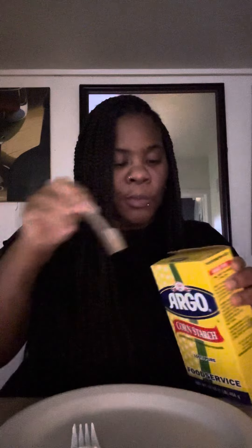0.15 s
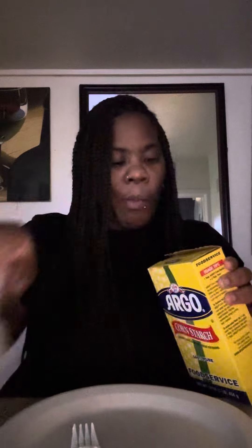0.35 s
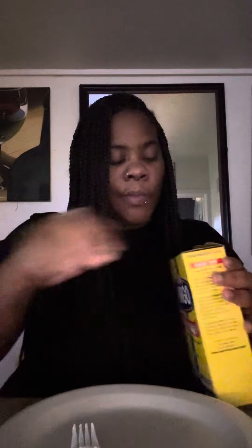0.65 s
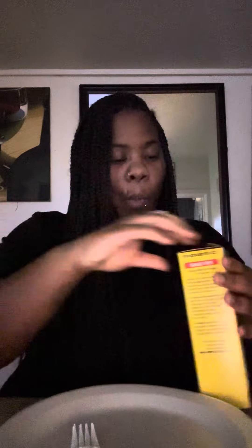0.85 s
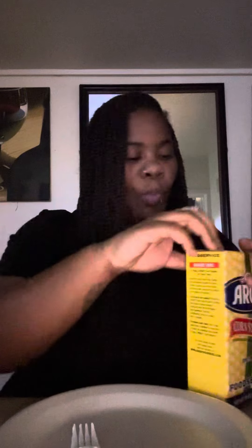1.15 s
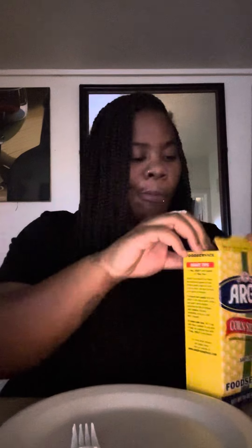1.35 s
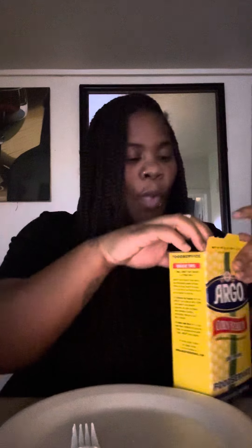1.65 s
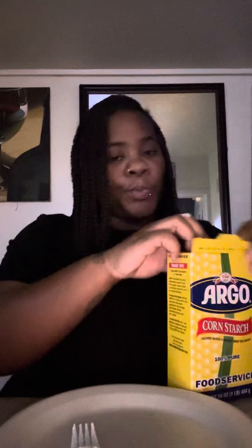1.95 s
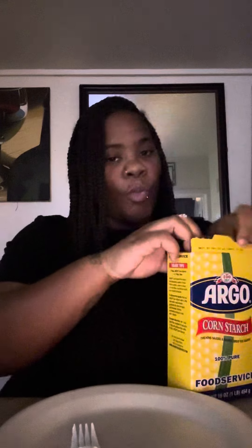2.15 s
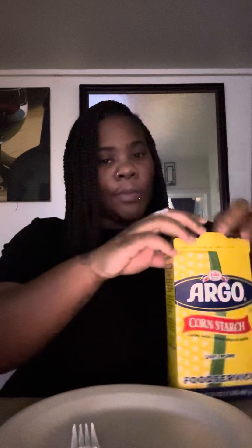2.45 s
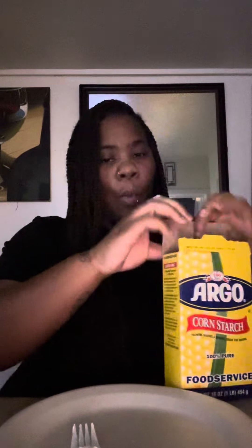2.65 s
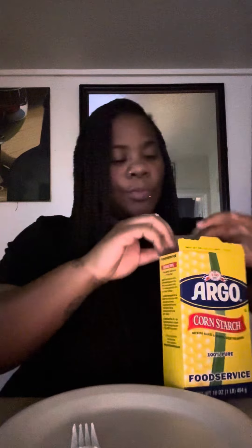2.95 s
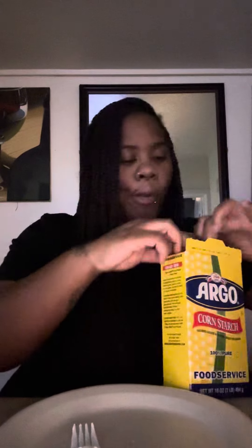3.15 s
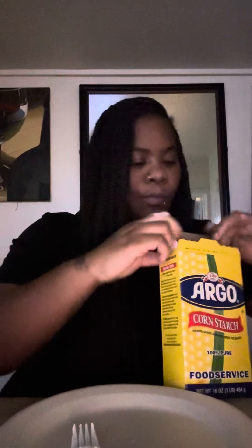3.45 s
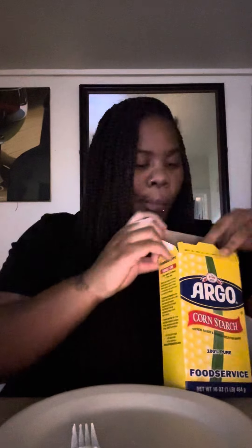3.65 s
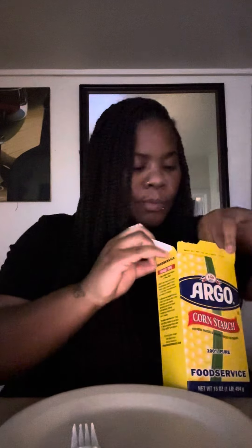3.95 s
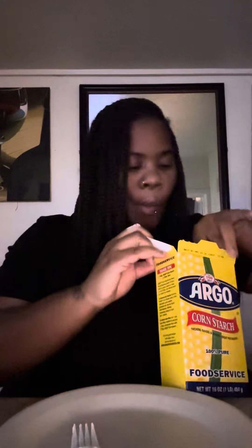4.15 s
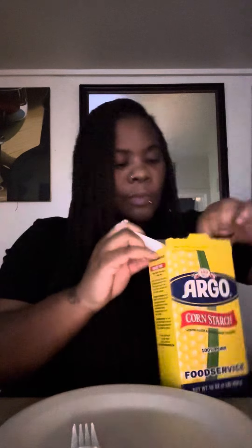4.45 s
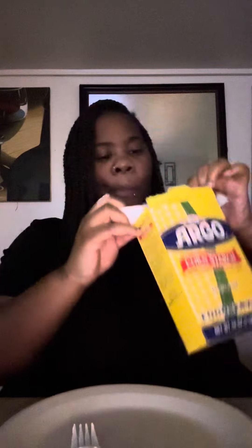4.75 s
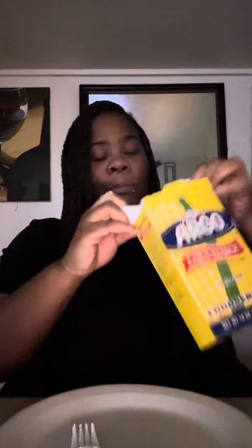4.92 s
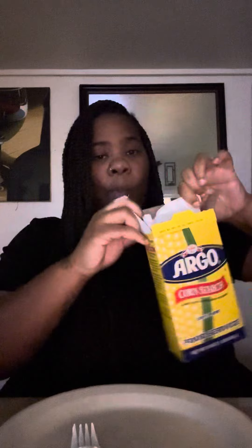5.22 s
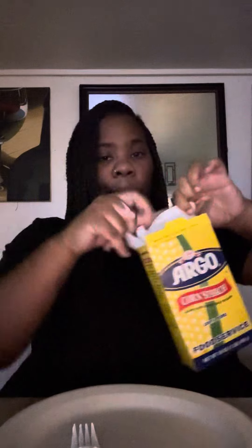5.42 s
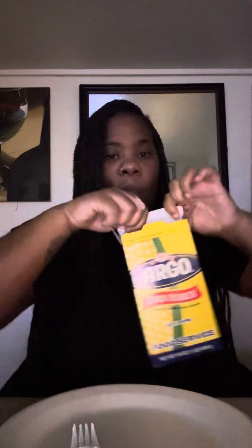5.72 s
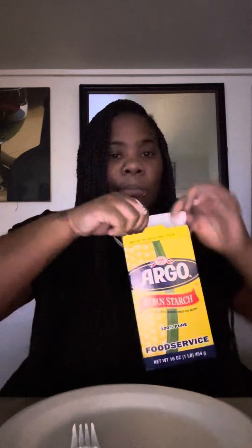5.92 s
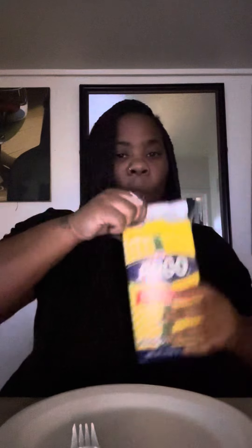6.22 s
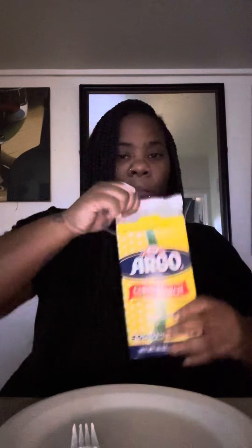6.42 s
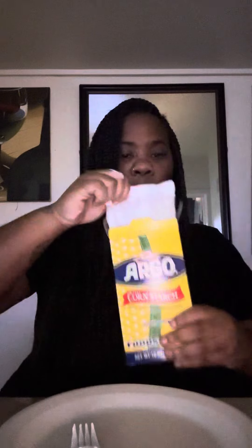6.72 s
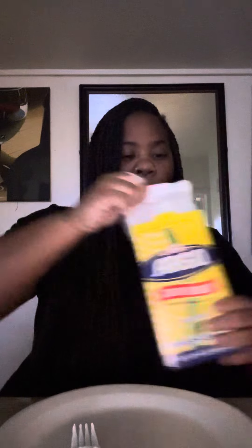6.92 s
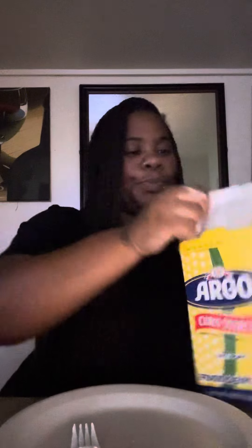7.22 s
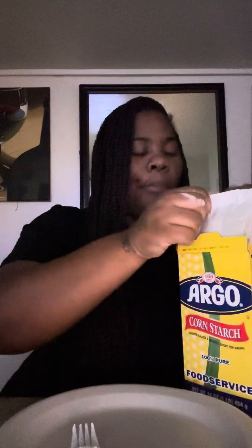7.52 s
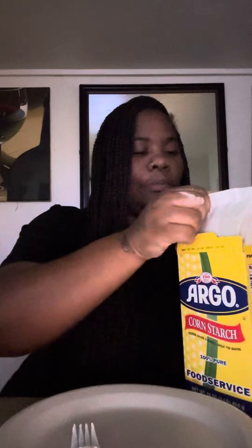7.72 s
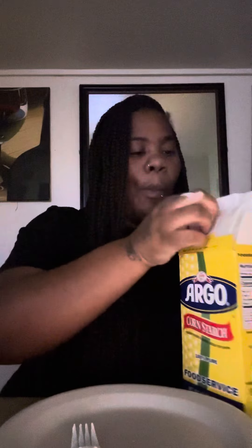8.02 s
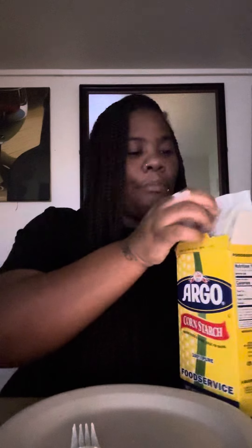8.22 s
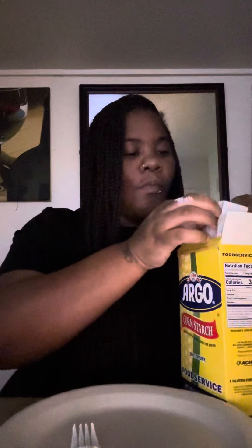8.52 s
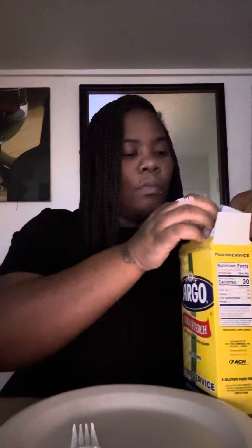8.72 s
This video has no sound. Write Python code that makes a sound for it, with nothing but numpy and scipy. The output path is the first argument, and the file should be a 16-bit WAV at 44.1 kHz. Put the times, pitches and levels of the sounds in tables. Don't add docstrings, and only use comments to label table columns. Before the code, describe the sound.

A quiet indoor room with a very faint low appliance drone; a phone microphone sits close to the hands. From 0 to 1.5 s there is a soft thud, then barely audible rubbing and light cardboard dents. A crisp tick comes at 1.6 s, then a firm rip and table push around 2.3 s and a hollow pop at 2.5 s. Light rustling and small pops continue to 3.7 s, followed by a brief lull. At 4.0-4.5 s the box tears in strong crackling bursts, loudest near 4.4 s. From 4.6 to 6.4 s come uneven tugs, folds and papery ticks, with a sharp burst at 6.5 s. Bright liner snaps cluster at 6.8-7.1 s, with a soft nudge at 7.2 s. Dense, loud crinkling runs 7.6-8.4 s, peaking in a dull snap near 8.35 s, then thins to scattered crackles until about 8.9 s.

```python
import sys
import numpy as np
from scipy import signal
from scipy.fft import rfft, irfft, next_fast_len
from scipy.io import wavfile
from scipy.ndimage import uniform_filter1d, map_coordinates

SR = 44100
rng = np.random.default_rng(int(sys.argv[2]) if len(sys.argv) > 2 else 0)


def ratio_of_db(decibels):
    return 10 ** (np.asarray(decibels, float) / 20)


def to_wav(sig):
    pcm = np.clip(np.atleast_2d(sig), -1, 1) * 32767
    pcm = np.round(pcm).astype(np.int16)
    wavfile.write(sys.argv[1], SR, pcm.T)


N = 391166


def unit(x):
    return x / np.sqrt(np.mean(x ** 2) + 1e-20)


def along(points, hz):
    f, v = np.transpose(points)
    return np.interp(np.log(hz + 1), np.log(f + 1), v)


def filtered(x, response):
    m = next_fast_len(N + SR // 2)
    return irfft(rfft(x, m) * response(np.fft.rfftfreq(m, 1 / SR)), m)[..., :N]


def coloured(x, spectrum):
    size = 4096
    cepstrum = irfft(np.log(ratio_of_db(along(spectrum, np.fft.rfftfreq(size, 1 / SR)))), size)
    cepstrum[1:size // 2] *= 2
    cepstrum[size // 2 + 1:] = 0
    h = irfft(np.exp(rfft(cepstrum)), size)[:size // 2]
    return signal.fftconvolve(x, h[None] / np.linalg.norm(h), axes=1)[:, :N]


def bursts(times, gains, t60, rise, ring_hz, ring, spectrum, size=900, uneven_db=0, focus_db=0):
    def column(v):
        return np.reshape(v, (-1, 1, 1))

    lead = 100
    t = (np.arange(size) - lead) / SR
    hz = np.fft.rfftfreq(size, 1 / SR) + 1

    ripples = np.arange(3, 21)[:, None]
    ripple_gains = uneven_db / 3 * rng.standard_normal((len(times), 1, len(ripples)))
    colour_db = ripple_gains @ np.cos(2 * np.pi * ripples * hz / SR)
    colour_db = colour_db - column(focus_db) * abs(np.log2(hz / column(ring_hz)))
    noise = irfft(rfft(rng.standard_normal((len(times), 2, size))) * ratio_of_db(colour_db), size)
    noise /= noise.std(axis=2, keepdims=True)

    phase = rng.random((len(times), 2, 1))
    tone = column(ring) * np.cos(2 * np.pi * (column(ring_hz) * t + phase))
    burst = (noise + tone) * np.where(t < 0, np.exp(t / rise), ratio_of_db(-60 * t / t60))
    burst += noise * (t > 0) * 0.22 * ratio_of_db(-60 * t / (9 * t60))

    body = unit(ratio_of_db(along(spectrum, hz)))
    heard = np.linalg.norm(rfft(burst) * body, axis=2, keepdims=True)
    burst *= column(gains) * np.sqrt(size / 2) / heard
    at = (np.round(np.asarray(times) * SR).astype(int)[:, None] + np.arange(size)).ravel()
    placed = [np.bincount(at, burst[:, k].ravel(), N + SR)[lead:N + lead] for k in (0, 1)]
    return coloured(np.array(placed), spectrum)


# frequency in Hz, density in dB per Hz.
AIR_SPECTRUM = [(22, -22), (109, -12), (143, -1.5), (169, -11.5), (278, -16.5), (398, -19), (569, -19.5),
                (2400, -50.5), (6500, -85)]
# line frequency in Hz, width in Hz, level in dB.
DRONE_LINES = [
    (61.3, 7.6, -58),
    (134.4, 3.1, -65),
    (262, 75, -51),
]


def still_room():
    air = unit(filtered(rng.standard_normal((2, N)), lambda hz: ratio_of_db(along(AIR_SPECTRUM, hz))))

    def line(centre, width):
        noise = rng.standard_normal((2, N))
        return unit(filtered(noise, lambda hz: 1 / (1 + ((hz - centre) / width * 2) ** 2)))

    drone = sum(ratio_of_db(db) * line(hz, width) for hz, width, db in DRONE_LINES)
    return ratio_of_db(-47.5) * air + drone


# time in seconds, peak in dB, ringing frequency in Hz.
TABLE_BUMPS = [
    (.016, -31.5, 104),
    (2.331, -29, 150),
    (2.524, -35, 134),
    (3.601, -35.5, 198),
    (4.011, -34.5, 223),
    (6.129, -35.5, 165),
    (7.218, -35.5, 199),
]
# frequency in Hz, level in dB.
TABLE_BODY = [(40, -10), (90, 9), (140, -6.5), (220, 4.5), (350, 3.5), (700, -37.5)]


def bumps():
    s, peak_db, hz = np.transpose(TABLE_BUMPS)
    return bursts(s, ratio_of_db(peak_db + 30.5), 0.074, 0.00037, hz, 0.56, TABLE_BODY, size=3000, focus_db=6.5)


# peak time in
# seconds, strength in dB, seconds to rise 20 dB, seconds to fall 20 dB, brightness in dB.
FLAP_MOVES = [(0, -53, .1, 0.5, -2), (.58, -49.5, 0.34, 0.24, 0), (.9, -52.5, 0.44, 1.8, 1.5),
              (1.2, -50, .5, 0.2, 4), (1.43, -48, .3, 0.26, 4), (1.627, -43, 0.08, 0.2, 5),
              (1.902, -40, 0.21, 0.1, 5), (2.17, -46.5, 0.3, 0, -0.5), (2.34, -39.5, 0.23, 0.3, .5),
              (2.54, -47.5, .1, 0.7, 2.5), (2.72, -45.5, .3, 0.33, 5), (2.9, -44, 0.03, 0.6, 3.5),
              (3.11, -39.5, 0.18, 0.16, 1.5), (3.3, -38.5, 0.17, .3, 2.5), (3.41, -38, 0.15, .5, 1),
              (3.6, -40, 0, .5, .5), (3.78, -56, .3, 3, 1)]
TUG_MOVES = [(4.016, -26.5, 0.056, 0.051, 0.5), (4.11, -39, 0.48, 0.62, 1.5), (4.183, -26, 0.039, 0.033, 1),
             (4.394, -22, 0.081, 0.19, -1.5), (4.601, -34.5, 0.47, 0.082, -0.5),
             (4.767, -32.5, 0.034, 0.88, 0.5), (5.173, -33, 0.2, 0.091, 0), (5.486, -30.5, 0.064, 0.29, 2),
             (5.675, -33, 0.015, 0.32, -5.5), (5.948, -33.5, 0.24, 0.071, 2), (6.124, -33, 0.099, 0.36, -2),
             (6.335, -37, 0.41, 0.019, 3), (6.449, -30.5, 0.027, 0.14, -7.5),
             (6.497, -25, 0.052, 0.062, 5.5), (6.89, -42, 0.14, 0.24, 0.5), (7.11, -31.5, 0.12, 0.23, 2)]
PICK_MOVES = [(7.413, -32.5, 0.028, 0.16, 1), (7.496, -38, 0.12, 0.017, -4),
              (7.706, -24, 0.045, 0.092, -2.5), (7.743, -24.5, 0.069, 0.054, 0.5),
              (7.884, -27, 0.069, 0.21, 0.5), (7.985, -23, 0.0825, 0.065, 1),
              (8.15, -22.5, 0.22, 0.078, -1), (8.256, -25.5, 0.089, 0.23, 1.5),
              (8.486, -34, 0.016, 0.082, -36), (8.555, -42.5, 0.37, 0.46, 16),
              (8.714, -29.5, 0.26, 0.12, 0), (8.87, -33.5, 0.12, .1, 4.5)]


def handling():
    rest_power, rest_bright_db = ratio_of_db(2 * -65), -7
    rounded = 1.062
    s = np.arange(0, N, 64) / SR
    moves = np.transpose(FLAP_MOVES + TUG_MOVES + PICK_MOVES)[..., None]
    at, peak_db, rise, fall, bright_db = moves
    distance = np.where(s < at, (at - s) / abs(rise), (s - at) / abs(fall))
    power = ratio_of_db(2 * (peak_db - 20 * distance ** rounded))
    total = power.sum(0) + rest_power
    sheet_db = 10 * np.log10(total)
    bright_db = ((power * bright_db).sum(0) + rest_power * rest_bright_db) / total
    box_db = sheet_db - 1 - np.maximum(bright_db, -4)
    middle_db = -40
    edge_db = middle_db + 1.253 * (sheet_db - middle_db) - 10 + bright_db
    return s, sheet_db, box_db, edge_db


def patchy(depth_db):
    z = signal.stft(rng.standard_normal((2, N)), nperseg=512)[2]
    field = uniform_filter1d(rng.standard_normal(z.shape[1:]), size=7, axis=0)
    field = uniform_filter1d(field, size=9, axis=1)
    return signal.istft(z * ratio_of_db(depth_db * unit(field)), nperseg=512)[1][:, :N]


# frequency in Hz, level in dB.
SHEET_BODY = [(900, -20), (1500, -20), (1800, -11), (2200, -2), (2500, -12), (3000, -9), (3500, -25.5),
              (6000, -41)]
BOX_BODY = [(200, -13.5), (400, -3), (1200, -4), (1500, -1), (2400, -40.5)]
EDGE_BODY = [(2000, -43), (3500, 0), (5500, -3.5), (6800, -1), (9000, -9), (11000, -12), (15000, -18),
             (16200, -103)]
RUB_BODY = [(900, -13.5), (1500, -20.5), (1800, -7), (2200, -2.5), (2500, -10.5), (3000, -10.5),
            (3800, -25.5), (6000, -38)]


def crinkle():
    s, sheet_db, box_db, edge_db = handling()
    count = 4200
    times = rng.random(count) * N / SR
    draw = rng.standard_normal((count, 7))
    size_db = 1.7 * map_coordinates(rng.standard_normal(600), [times * 60]) + 3.54 * draw[:, 0]
    clock = np.arange(N) / SR
    creased = np.clip((np.interp(clock, s, box_db) + 57.5) / 20, .1, .92)
    layers = [(sheet_db - 2.5, SHEET_BODY, RUB_BODY, .007, 2300, .22),
              (box_db - 4.5, BOX_BODY, BOX_BODY, .014, 850, .35),
              (edge_db - 3.5, EDGE_BODY, EDGE_BODY, .005, 6500, .4)]
    out = 0
    for k, (level_db, body, rub_body, t60, hz, spread) in enumerate(layers):
        pitch = hz * np.exp(spread * draw[:, 4 + k])
        gains = ratio_of_db(np.minimum(size_db + 1.8 * draw[:, 1 + k], 6))
        grains = unit(bursts(times, gains, t60, 0.0005, pitch, 0.57, body, size=400, uneven_db=2.0))
        rub = unit(coloured(patchy(depth_db=3.5), rub_body))
        grip_db = 2.1 * map_coordinates(rng.standard_normal(count), [clock * 13])
        texture = np.sqrt(creased) * grains + np.sqrt(1 - creased) * rub
        out = out + ratio_of_db(np.interp(clock, s, level_db) + grip_db) * texture
    return out


# time in seconds, sheet in dB, hollow box in
# dB, ringing panel in Hz.
PANEL_POPS = [(.8882, -41, -32, 680), (1.4283, -30, -32, 714), (1.7998, -45, -37.5, 620),
              (2.5284, -17, -18, 785), (2.5384, -25, -56, 740), (2.874, -33, -35.5, 774),
              (2.9258, -30, -30.5, 1010), (3.0705, -35, -26.5, 910), (3.2387, -29.5, -26.5, 980),
              (3.3024, -25, -22, 806), (4.008, -38, -24.5, 900), (4.1382, -34, -28, 950),
              (4.4345, -27, -16.5, 1000), (4.567, -26, -24.5, 960), (4.848, -24, -26.5, 795),
              (5.4298, -25.5, -31, 920), (5.5714, -41, -28, 1030), (6.1628, -24, -33, 495),
              (6.4345, -22, -37, 700), (6.6723, -30.5, -38, 1020), (6.6895, -29.5, -39, 1020),
              (6.8279, -37, -31, 990), (7.2008, -30, -27.5, 493), (7.258, -26.5, -29.5, 1085),
              (7.6224, -27, -36.5, 930), (7.703, -14, -25.5, 746), (8.3675, -18, -23, 650),
              (8.6273, -35, -35, 1350), (8.638, -32, -32, 590),
              (0.607, -48, -36.5, 1090), (0.8693, -53, -40.5, 650), (0.9216, -43, -41, 720),
              (0.9701, -42, -44, 516), (0.9793, -39, -42.5, 605), (1.1535, -49, -41, 620),
              (1.218, -38.5, -42.5, 690), (1.8387, -39, -46, 660), (1.944, -39, -41.5, 860),
              (2.2381, -57, -38, 860), (2.2955, -39, -38.5, 530), (2.4401, -39, -39, 530),
              (2.503, -37, -40, 520), (2.9636, -38, -39, 750), (3.0985, -34, -35, 950),
              (3.329, -28, -46, 850), (4.0199, -38, -22, 940), (4.1669, -25, -27.5, 880),
              (4.2633, -45, -35, 930), (4.2939, -45, -38, 920), (4.3313, -31, -27, 880),
              (4.353, -33, -26, 910), (4.406, -29, -22, 910), (4.4371, -10, -18, 970),
              (4.464, -20, -26, 940), (4.5226, -44, -32, 1490),
              (4.6187, -29, -33.5, 510), (5.0544, -43, -33, 567), (5.134, -30, -33, 920),
               (5.3654, -34, -40, 1390), (5.4005, -32.5, -42, 890), (5.4686, -29, -33, 620),
               (5.6397, -32, -40, 1090), (5.6721, -22, -23.5, 1260), (5.6818, -18, -25, 1200),
               (5.7424, -23, -21.5, 1030), (5.793, -38, -32, 575), (5.8092, -26, -30, 975),
               (5.828, -34, -31, 900), (5.883, -35, -32, 830), (5.9812, -37, -33.5, 770),
               (6.1202, -25, -31, 530), (6.179, -34, -36, 706), (6.216, -24, -32.5, 930),
               (6.2331, -29, -32, 1060), (6.534, -27, -35, 1120), (6.33, -40, -38, 800),
               (6.7763, -43, -40, 610), (7.4986, -29, -37, 557), (7.6585, -35, -34.5, 584),
               (7.8279, -38, -40, 460), (7.8808, -32, -23.5, 506), (7.9228, -24, -36, 1390),
               (8.0496, -34, -36, 1420), (8.0839, -23, -25, 1400), (8.099, -24, -31, 590),
               (8.1177, -20, -26, 930), (8.1535, -16, -23, 1430), (8.217, -27, -27.5, 587),
               (8.2415, -30, -24.5, 490), (8.777, -36, -37, 800), (8.799, -37, -33.5, 524)]
# time in seconds, sheet in dB.
SHEET_NIPS = [(0.7793, -40.5), (0.7991, -42.5), (0.9564, -41), (1.6498, -37), (1.733, -34), (3.1392, -27.5),
              (3.3979, -26), (3.4222, -24.5), (3.5958, -29), (4.189, -15), (4.1955, -23), (4.2114, -23),
              (4.2172, -24), (4.3171, -30), (4.5031, -34), (4.5884, -23), (4.751, -28.5), (4.8556, -24),
              (4.878, -32), (4.9157, -23), (5.011, -28), (5.043, -33), (5.164, -21), (5.5919, -25.5),
              (5.695, -18), (5.7817, -26), (6.026, -28), (6.3481, -25), (6.3634, -28), (6.518, -19.5),
              (6.886, -21), (6.9725, -34), (7.1068, -12), (7.112, -13), (7.1658, -25), (7.2188, -26),
              (7.712, -16), (7.935, -16.5), (7.9434, -17.5), (7.9594, -16), (7.975, -12), (8.0164, -11),
              (8.0225, -17), (8.263, -19), (8.31, -18), (8.4699, -33), (8.477, -20), (8.8272, -23),
              (8.836, -23)]
# time in seconds, sheet in dB, hollow box in dB, patch in Hz.
SHEET_FOLDS = [(2.277, -27.5, -42, 805), (2.7221, -22.5, -36, 826), (3.117, -16, -27.5, 850),
               (4.6288, -22, -36.5, 4500), (4.7764, -20, -33, 596), (4.9343, -23, -39, 1400),
               (5.1873, -18, -28, 3600), (5.767, -20, -31, 1290), (5.8395, -13, -26.5, 1150),
               (5.8498, -14, -28.5, 1400), (5.9252, -22, -33, 1450), (5.9428, -18, -28.5, 860),
               (6.0603, -23, -45, 3600), (6.357, -26.5, -42, 1090), (6.487, -15, -27, 1010),
               (6.4963, -11, -27.5, 1100), (6.934, -21, -41, 1400), (7.1023, -7.5, -28, 1200),
               (7.138, -13.5, -52, 1370), (7.404, -17, -33, 970), (7.585, -29, -42, 600),
               (7.6741, -19, -35, 4660), (7.753, -15, -38, 1360), (7.835, -21, -43, 447),
               (7.897, -22, -31, 1390), (7.985, -12.5, -32, 595), (8.3507, -4.5, -23.5, 595),
               (8.374, -19, -29, 664), (8.3974, -12, -28, 1010), (8.8478, -16, -32, 1410)]
# time in seconds, sheet in dB, jolt in dB, patch in Hz.
FIBRE_RIPS = [(0.565, -44, -48, 9600), (2.307, -28.5, -32.5, 1200), (2.3349, -13.5, -22, 770),
              (3.6027, -22, -27, 565), (3.958, -25, -29, 890), (4.0944, -25, -28, 8300),
              (4.1774, -14.5, -30.5, 900), (4.391, -9.5, -17, 850), (4.8072, -32, -25.5, 4430),
              (4.9286, -24.5, -31.5, 1460), (5.1162, -17.5, -28, 980), (5.1749, -22, -33, 597),
              (5.221, -26, -32.5, 1340), (5.656, -11.5, -18.5, 5830), (5.666, -16, -17.5, 1050),
              (5.7312, -27, -26, 8200), (5.8032, -22.5, -24.5, 990), (5.9394, -18.5, -23, 5900),
              (6.445, -18, -31, 504), (6.5454, -20.5, -23.5, 4600), (7.416, -16, -26, 3620),
              (7.4809, -27, -31, 840), (7.892, -16, -20.5, 7350), (8.0106, -11, -20.5, 5570),
              (8.28, -11.5, -19, 3500), (8.3002, -18, -25, 600), (8.4892, -30, -30, 605),
              (8.702, -13.5, -25, 1450)]
# time in seconds, sheet in dB, crisp edge
# in dB, ringing patch in Hz.
LINER_TICKS = [(1.6161, -11.5, -21, 9200), (2.167, -20, -20, 9900), (3.031, -29.5, -32.5, 5600),
               (4.102, -29, -34, 3480), (4.336, -20, -21.5, 8400), (4.3432, -25, -24, 9150),
               (4.762, -19.5, -29, 4630), (5.168, -27, -30.5, 9200), (5.4898, -14, -28.5, 5450),
               (0.6078, -20.5, -28, 10100), (5.688, -13, -23, 4130), (5.7464, -13, -19, 10200),
               (5.856, -21, -35, 8000), (5.8862, -21, -30.5, 4970), (6.072, -24, -36, 7660),
               (6.1137, -19, -29, 7700), (6.794, -29, -42, 8400), (6.8396, -10, -18, 11900),
               (6.844, -14.5, -31, 9200), (6.8702, -11, -22.5, 7300), (6.896, -13.5, -28, 4720),
               (7.0382, -22, -28.5, 7450), (7.0551, -8.5, -24.5, 4930), (7.094, -12, -25.5, 3580),
               (7.119, -14, -19, 4770), (8.235, -10.5, -20.5, 7500), (8.4818, -25, -24.5, 4400),
               (8.5202, -22, -26.5, 8750), (8.661, -21.5, -27.5, 4700), (8.725, -18, -27.5, 4750),
               (0.496, -65, -59, 12000), (1.621, -19.5, -29, 9600), (1.6737, -47, -43, 9800),
                (3.994, -48, -26, 5330), (4.3731, -20, -35, 3400), (4.3974, -16, -27, 3660),
                (4.4525, -16.5, -24.5, 4350), (4.565, -39, -40, 5000), (5.2283, -38, -33, 5000),
                (5.5451, -26, -33.5, 4860), (6.266, -43, -32.5, 5000), (5.8811, -23.5, -31, 5300),
                (6.4614, -18.5, -27, 4850), (7.872, -19.5, -31, 3670), (8.094, -22, -26, 4610),
                (8.1378, -26, -35, 4440), (8.1667, -18, -23.5, 10300), (8.1738, -18.5, -26.5, 5940),
                (8.2262, -19, -32, 3770), (8.2413, -32, -34, 5940), (8.2574, -23, -31, 4780),
                (8.6441, -32, -27.5, 12900)]


def breaks():
    panels = PANEL_POPS
    rows = [(s, sheet, box, box - 18, hz) for s, sheet, box, hz in panels]
    rows += [(s, sheet, sheet - 18.5, sheet - 25, 1350) for s, sheet in SHEET_NIPS]
    rows += [(s, sheet, box, sheet - 19.5, hz) for s, sheet, box, hz in SHEET_FOLDS]
    rows += [(s, sheet, jolt, jolt - 1.5, hz) for s, sheet, jolt, hz in FIBRE_RIPS]
    rows += [(s, sheet, sheet - 20.5, edge, hz) for s, sheet, edge, hz in LINER_TICKS]
    return np.array(rows)


# frequency in Hz, level in dB.
SNAP_EDGE_BODY = [(2000, -43), (3500, -3.5), (5500, -5.5), (6800, -5.5), (9000, -6.5), (12000, -15.5),
                  (15500, -16.5), (16600, -57)]


def snaps():
    s, sheet_db, box_db, edge_db, hz = breaks().T[..., None]
    draw = rng.random((len(s), 2, 2))
    s = np.hstack([s, s + 0.0047 + 0.013 * draw[:, 0] ** 2.1]).ravel()
    weaker_db = np.hstack([0 * hz, -13.5 - 12 * draw[:, 1]])
    hz = hz + 0 * weaker_db
    low = hz < 2500
    rise = .0004
    cavity_hz = 2226 * (1 + 0.052 * rng.standard_normal(len(s)))
    sheet_gain = ratio_of_db(sheet_db + 17.0 + weaker_db)
    box_gain = ratio_of_db(box_db + 18.0 + 5.73 * low + weaker_db)
    edge_gain = ratio_of_db(edge_db + 18 + 1.5 * ~low + weaker_db)
    sheet = bursts(s, sheet_gain, .007, 2 * rise, cavity_hz, 0.44, SHEET_BODY, uneven_db=1.0)
    box = bursts(s, box_gain, 0.014, 2 * rise, hz, 0.83 * low, BOX_BODY, uneven_db=2.0)
    edge = bursts(s, edge_gain, .004, rise, hz, 0.5 * ~low, SNAP_EDGE_BODY,
                  uneven_db=3.0, focus_db=2.1 * ~low)
    return sheet + box + edge


# frequency in Hz, t60 in seconds.
ROOM_T60 = [(200, 0.09), (2000, 0.13)]


def room(x):
    out, step = np.zeros((2, N + SR)), SR // 3
    for at in range(0, N, step):
        hz, t, z = signal.stft(rng.standard_normal((2, SR // 4)), SR, nperseg=256)
        decay = ratio_of_db(-60 * t / along(ROOM_T60, hz)[:, None])
        tail = signal.istft(z * decay, SR, nperseg=256)[1]
        wet = signal.fftconvolve(x[:, at:at + step], tail / np.linalg.norm(tail[0]), axes=1)
        out[:, at + 500:at + 500 + wet.shape[1]] += wet
    return out[:, :N]


# frequency in Hz, width in Hz, depth from 0 to 1.
CASING_NOTCHES = [(1694, 257, 0.27), (2297, 55, 0.85), (3180, 180, 0.42)]


def casing(x):
    def response(f):
        return np.prod([1 - depth * 1j * f * width / (hz * hz - f * f + 1j * f * width)
                        for hz, width, depth in CASING_NOTCHES], axis=0)
    return filtered(x, response)


# frequency in Hz, lead of the left in radians, negative where it lags.
PORT_LEAD = [(0, 0), (1150, 0), (1500, .9), (1850, -.6), (2250, 0), (2750, -.9), (3300, .3), (4700, 0),
             (6900, -2.8), (8300, -3.4), (10500, -5.9), (12800, -6.7), (14300, -9.3)]
# frequency in Hz, left minus right in dB.
PORT_SHADOW = [(900, 0), (1450, -7), (1800, -1), (2500, .4)]


def ports(pair, alike):
    def split(hz):
        turn = np.arccos(np.clip(along(alike, hz), 0, 1)) / 2
        return np.array([np.cos(turn), np.sin(turn)])

    def left_and_right(hz):
        lead = np.interp(hz, *np.transpose(PORT_LEAD))
        tilt = ratio_of_db(along(PORT_SHADOW, hz) / 2) * np.exp(.5j * lead)
        return np.array([tilt, 1 / tilt])

    common, differing = filtered(pair, split)
    return filtered(np.array([common + differing, common - differing]), left_and_right)


# frequency in Hz, likeness 0 to 1.
NEAR_ALIKE = [(200, .9995), (900, .98), (1300, .75), (1750, .4), (2200, .99), (2700, .75), (3200, .5),
              (5500, .72), (7500, .93), (12000, .9), (13500, .72), (15200, .95)]
FAR_ALIKE = [(200, .9995), (450, .97), (1200, .2), (2200, .9), (3200, .2), (7500, .9)]


def scene():
    far = still_room()
    pushes = bumps()
    paper = filtered(crinkle() + snaps(), lambda hz: (1j * hz / (160 + 1j * hz)) ** 2)
    hands = paper + pushes
    near = casing(hands + ratio_of_db(-13.0) * room(hands))
    return ports(near, NEAR_ALIKE) + ports(far, FAR_ALIKE)


def roll_off(x):
    return signal.sosfilt(signal.butter(12, 16660, fs=SR, output="sos"), x)


def record(dry):
    rounded = dry / (1 + (dry / .85) ** 4) ** .25
    return roll_off(rounded)


dry = scene()
out = record(dry)
to_wav(out)
```